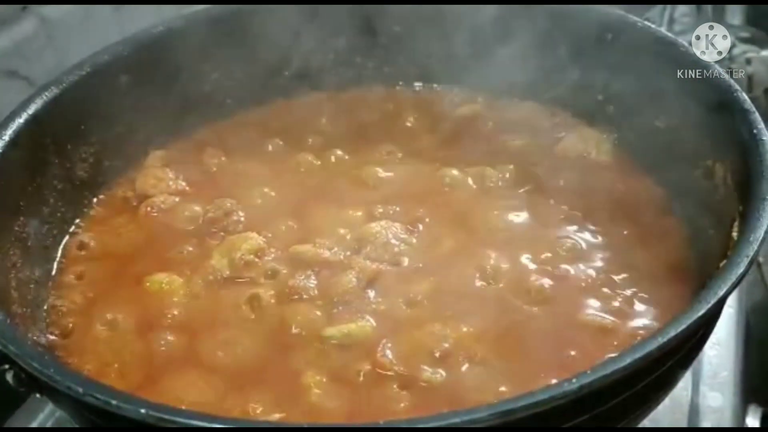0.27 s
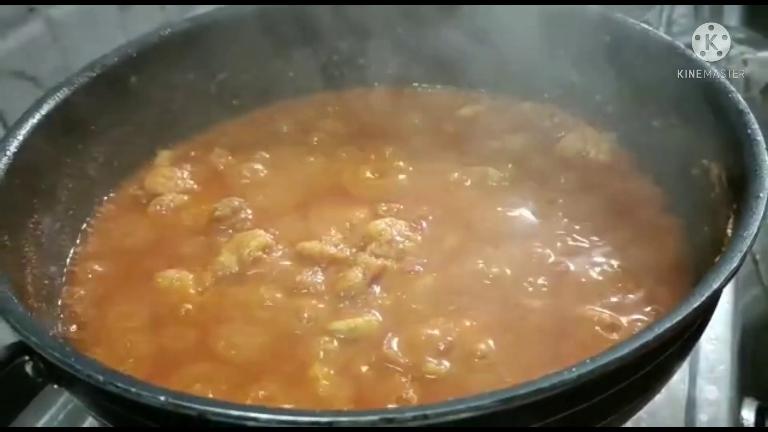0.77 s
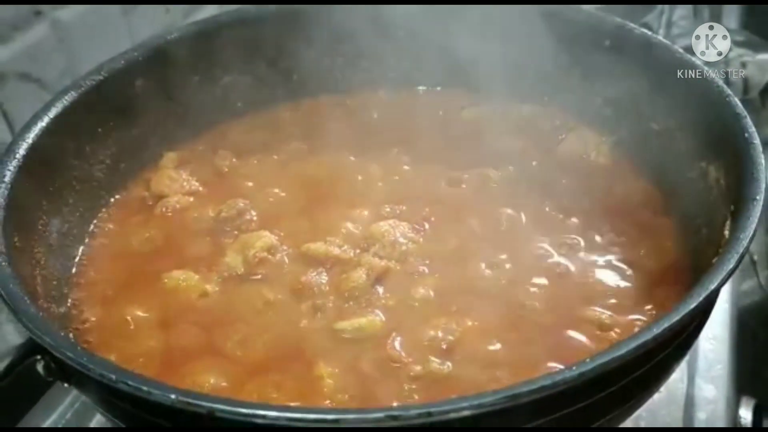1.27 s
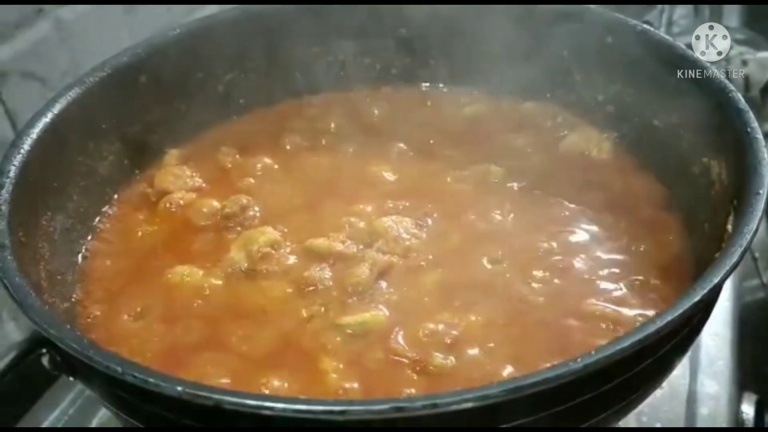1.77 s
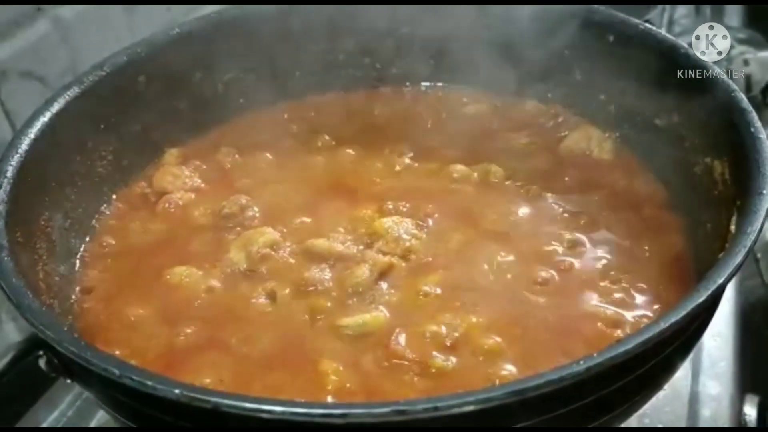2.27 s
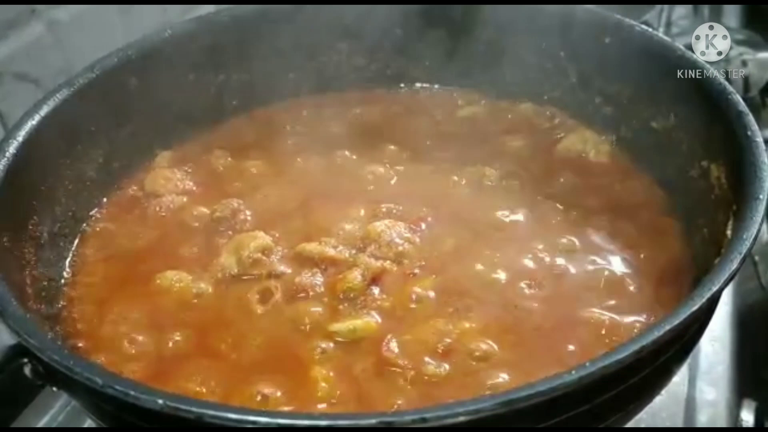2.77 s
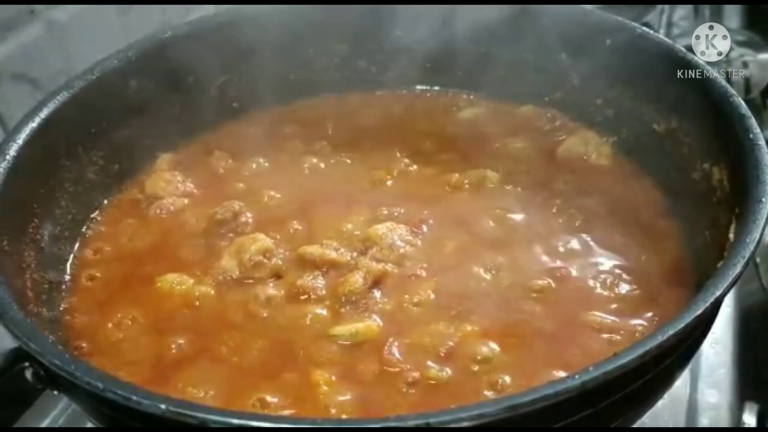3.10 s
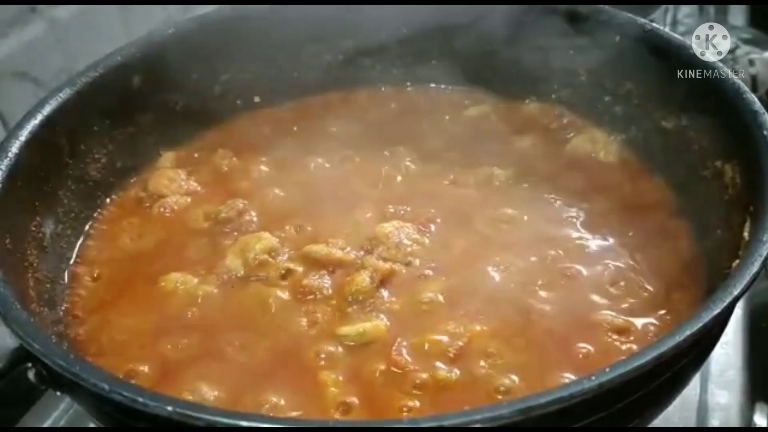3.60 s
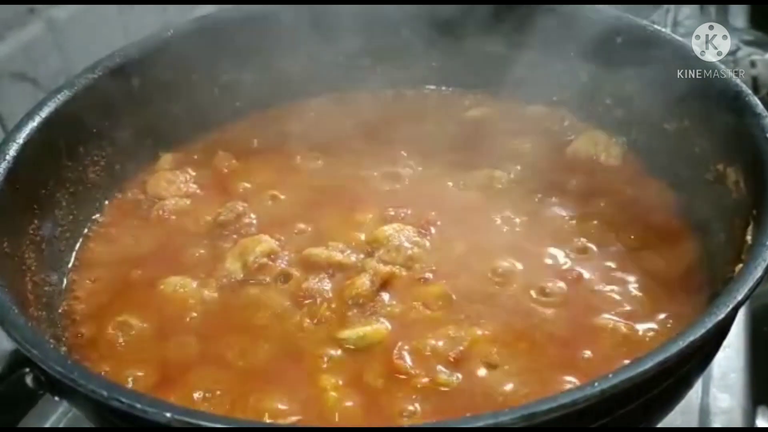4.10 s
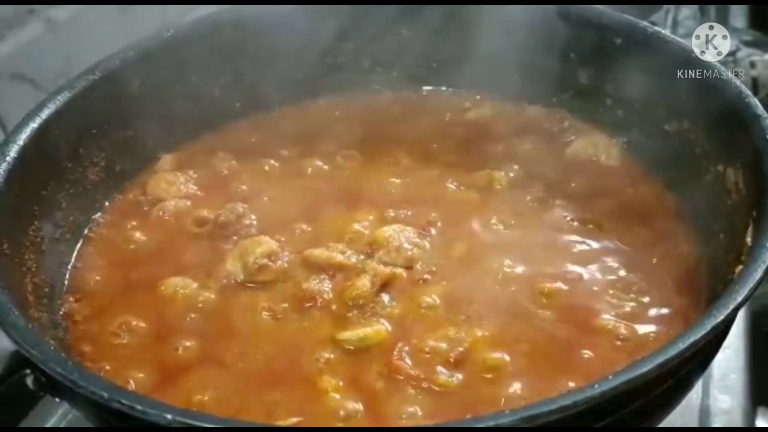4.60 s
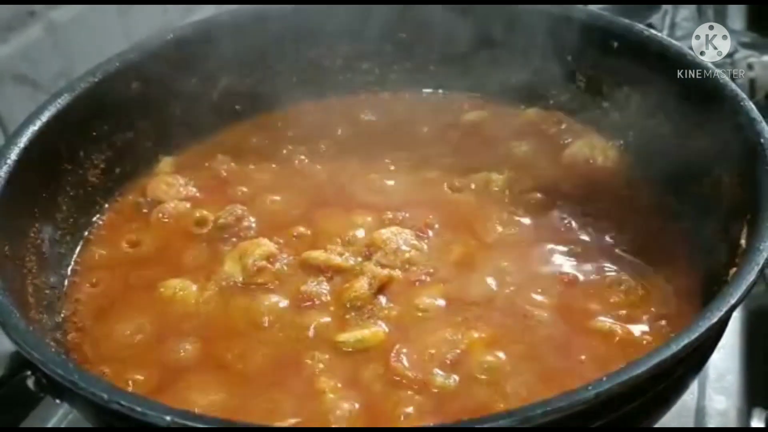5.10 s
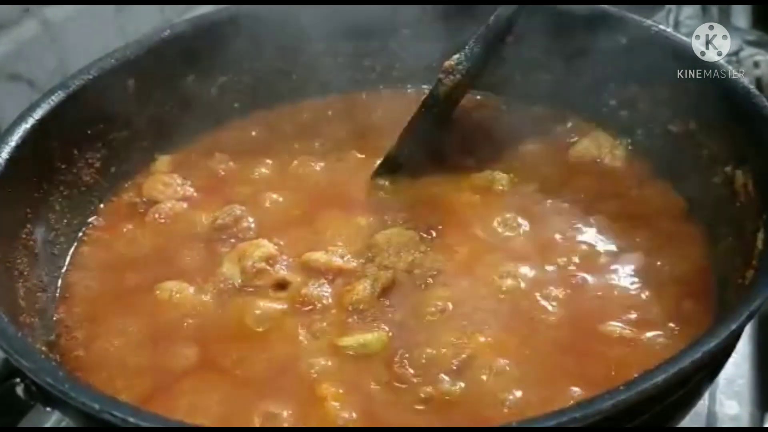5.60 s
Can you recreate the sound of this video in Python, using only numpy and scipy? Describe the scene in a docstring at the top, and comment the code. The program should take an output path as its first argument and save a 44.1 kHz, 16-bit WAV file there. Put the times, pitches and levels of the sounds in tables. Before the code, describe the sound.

A pan of thick sauce bubbles over a humming gas ring throughout. Bright metal scraping bursts in during the first two seconds, ending in a brief lower rim drag. After a very faint reedy note, a pot clatters onto the counter and chatters still. The simmer returns to the front, with thin wavering squeaks, spitting droplets, splashes and tiny clinks, heard close with short indoor echo.

```python
"""Thick curry simmers over a humming gas ring throughout: resonating bubbles over noise-like sizzle and flame.
From 0.6 s a steel utensil knocks and scrapes on a dish to the right, stick-slip jerks driving its modes;
then the dish drags briefly on its rim. A faint reedy tone of sine partials precedes a pot that lands at 2.1 s,
slides and rocks to rest. Thin wavering squeaks follow, then wet splashes, a rising gurgle and small clinks."""
import sys
import numpy as np
from scipy import signal
from scipy.fft import rfft, irfft
from scipy.io import wavfile
from scipy.ndimage import uniform_filter1d

SR = 44100
rng = np.random.default_rng(int(sys.argv[2]) if len(sys.argv) > 2 else 0)


def transcribe(u):
    """Save the signal u as a 16-bit wav file named by the first command-line argument.

    u: samples, shape (n,) or (channels, n), limited to [-1, 1]; the rate is SR.
    q: integer samples, one column per channel.
    """
    v = np.clip(np.atleast_2d(u).T, -1, 1)
    q = np.round(v * 32767).astype(np.int16)
    wavfile.write(sys.argv[1], SR, q)


N = 259308
T = np.arange(N) / SR   # time in seconds

# The utensil knocks on the dish and skids on. Each row: start in seconds, relative knock level in dB,
# skid length in seconds, relative skid pressure in dB.
STROKES = [(0.5543, -19, 0.033, -32), (0.6333, -19, 0.014, -29.5), (0.694, -24, 0.067, -27),
           (0.8673, -12, 0.05, -25.5), (0.935, -10.5, 0.035, -22), (1.0782, -10, 0.044, -23),
           (1.1368, -9, 0.055, -18), (1.185, -9.5, 0.053, -19), (1.25, -21, 0.086, -19),
           (1.3324, -9, 0.059, -16), (1.4078, -7.5, .11, -17.5), (1.6284, -16.5, 0.028, -35.5),
           (1.7215, -31.5, .02, -49)]
# Colour of spitting droplets. Each row: frequency in Hz, relative level in dB.
SPIT_COLOUR = [(1500, -25), (5000, -8), (8000, 4), (11000, 7), (15000, -24)]


def from_db(db):
    """Gain is the antilogarithm of a level: 20 dB is a factor of ten in amplitude."""
    return 10 ** (np.asarray(db) / 20)


def rms_one(x):
    """Normalise to unit root-mean-square amplitude."""
    return x / np.sqrt(np.mean(x ** 2) + 1e-20)


def energy_one(response):
    """An impulse response of unit mean energy keeps the power of white noise."""
    return rms_one(response) / np.sqrt(response.shape[-1])


def at_hz(points, hz):
    """Interpolate (Hz, value) points on a logarithmic frequency axis."""
    f, value = np.transpose(points)
    return np.interp(np.log(np.maximum(hz, 1)), np.log(f), value)


def bins(size):
    """Discrete spectra sample frequency evenly: the bin frequencies in Hz for size samples."""
    return np.arange(size // 2 + 1) * SR / size


def waver(span):
    """Low-pass noise: white noise averaged twice over span seconds, with unit rms."""
    size = max(int(span * SR), 2)
    once = uniform_filter1d(rng.standard_normal(N), size)
    return rms_one(uniform_filter1d(once, size))


def tone(hz, wobble):
    """Frequency modulation: a sine whose phase accumulates an unsteady frequency."""
    unsteady_hz = hz * (1 + wobble * waver(span=0.0082))
    return np.sin(2 * np.pi * np.cumsum(unsteady_hz) / SR)


def swell(start, length, db, attack_s, release_db_per_s, sag_db_per_s=0):
    """Envelope of one gesture: a linear rise, a hold or sag for its length, then exponential decay."""
    age = np.maximum(T - start, 0)
    loss_db = sag_db_per_s * age + release_db_per_s * np.maximum(age - length, 0)
    return np.minimum(age / attack_s, 1) * from_db(db - np.clip(loss_db, 0, 200))


def diffuse(spectrum, size):
    """Diffuse-field coherence: coloured stereo noise, most alike at both ports in the bass."""
    # Likeness of the two ports. Each row: frequency in Hz, correlation.
    likeness = [(100, 1), (300, 0.95), (600, 0.81), (1000, 0.27), (1500, -0.31), (2500, 0.22),
                (4000, -0.051)]
    hz = bins(size)
    alike = np.clip(at_hz(likeness, hz), -1, 1)
    mid, side = rfft(rng.standard_normal((2, size)))
    pair = np.sqrt(1 + alike) * mid + np.sqrt(1 - alike) * side * [[1], [-1]]
    return rms_one(irfft(pair * from_db(at_hz(spectrum, hz)), size))


def dying(spectrum, t60, size=32768):
    """High modal density: countless overlapping modes ring as decaying noise; the treble dies sooner."""
    noise, t = diffuse(spectrum, size=size), T[:size]
    low = signal.sosfilt(signal.butter(1, 5000, fs=SR, output="sos"), noise)
    treble = noise - low
    return energy_one(low * from_db(-60 * t / t60) + treble * from_db(-60 * t / (0.32 * t60)))


def modal(modes, spread_db=0, size=32768):
    """Modal superposition: decaying sines, later at the left port; their shares vary by chance with spread_db."""
    lag_s = -0.0003   # how much sooner the left port hears the metal
    t, out = T[:size], 0
    for hz, db, t60 in modes:
        delay_phase = np.pi * hz * lag_s * np.array([[1], [-1]])
        phase = rng.uniform(0, 2 * np.pi) + delay_phase + rng.normal(0, 1.0, (2, 1))
        decay = from_db(db + spread_db * rng.normal() - 60 * t / t60) / np.sqrt(t60)
        out = out + decay * np.sin(2 * np.pi * hz * t + phase)
    return energy_one(out)


def crowd(modes, spectrum, t60, width_hz, valley_db, count=55):
    """Modal clustering: weaker modes gather round the strong ones and scatter through the treble."""
    ring = dying(spectrum, t60)
    hz = bins(ring.shape[-1])
    treble = np.linspace(6400, 16000, count) + rng.normal(0, 60, count)
    centres = np.r_[np.array(modes)[:, 0], treble]
    clusters = np.exp(-((hz - centres[:, None]) / width_hz) ** 2).max(axis=0)
    shaped = irfft(rfft(ring) * (from_db(valley_db) + clusters))
    return energy_one(shaped * (T[:shaped.shape[-1]] < .5))   # no ring after 0.5 s


def building(response, rise_s):
    """Finite spreading time: a response builds up exponentially with time constant rise_s."""
    return response * (1 - np.exp(-T[:response.shape[-1]] / rise_s))


def sound(force, response):
    """Linear response: convolve a force with a body's impulse response."""
    return signal.fftconvolve(np.atleast_2d(force), response, axes=-1)[:, :N]


def blows(rows):
    """An ideal impact is an impulse: one click for each row of (s, dB)."""
    out = np.zeros(N)
    for s, db in rows:
        out[int(s * SR)] += from_db(db)
    return out


def grains(per_s, spread_db):
    """Random point process: clicks of either sign and uneven size at random moments, with unit rms."""
    sizes = from_db(spread_db * np.minimum(rng.exponential(1, N), 3.5)) * rng.choice([-1, 1], N)
    return rms_one(sizes * (rng.random(N) < per_s / SR))


def softened(force, corner_hz):
    """Contact compliance: a sliding contact is softer than a knock and has less treble."""
    return signal.sosfilt(signal.butter(1, min(corner_hz, .45 * SR), fs=SR, output="sos"), force)


def bubble(hz, t60, rise, size=4096):
    """Cavity resonance: an opening bubble rings, rising in pitch as its mouth widens."""
    t = T[:size]
    glide = 1 + rise * np.minimum(t / t60, 1)
    ring = np.sin(2 * np.pi * hz * np.cumsum(glide) / SR)
    return ring * from_db(-60 * t / t60) * (1 - np.exp(-t * hz))


def from_pan(x):
    """Interaural-style delay: sound from the pan reaches the left port first."""
    lag_s = 0.00021
    return np.array([x, np.interp(T - lag_s, T, x)])


def add(out, s, x):
    """Superposition: mix x into out from time s."""
    at = int(s * SR)
    out[at:at + len(x)] += x[:N - at]


def skid_pressure(strokes):
    """Contact force of sliding: every skid bites, eases and lifts off."""
    return sum(swell(s, length, db, attack_s=0.0035, release_db_per_s=431, sag_db_per_s=41)
               for s, _, length, db in strokes)


def scraping(strokes):
    """Stick-slip friction: a knock for each stroke, then tiny jerks under the skid pressure."""
    grip = from_db(2.95 * waver(span=0.005))   # the edge catches and lets go
    rough_force = skid_pressure(strokes) * grip * grains(per_s=800, spread_db=0)
    jerks = softened(rough_force, corner_hz=10000)
    knocks = blows([row[:2] for row in strokes])
    return from_db(23.5) * knocks + from_db(1.5) * jerks


def dish(count=3):
    """Modal excitation by place: strokes on a few spots in turn differ in colour; the dragged rim rings lower."""
    # Ringing modes of dish and rim. Each row: frequency in Hz, relative level in dB, t60 in seconds.
    dish_modes, rim_modes = [(678, -10, .25), (763, -19, .4), (1027, -11, .5), (1561, -15, .6),
                             (1849, -4, .4), (1999, -5, .4), (2080, -7, .6), (2219, -9, .4),
                             (2670, -11, .4), (2834, -9, .5), (2902, -4, .7), (3046, -8, .6),
                             (3091, -5.5, .9), (3251, -10, .4), (3397, -4, .4), (3461, -.5, .5),
                             (3836, -7, .35), (4039, 2, .45), (4230, -8, .4), (4583, -9, .35),
                             (4670, -9, .35), (4930, -7, .3), (5255, -2, .4), (5731, -11, .3),
                             (6141, -2, .4), (6700, -17, .3), (7674, -12, .25), (8200, -13, .2),
                             (8420, -12, .2), (8880, -15, .2)], [(675, -12, .2), (765, -8, .4), (850, -8, .35),
                                                 (977, -10, .4), (1047, -3, .55), (1120, -4, .4),
                                                 (1165, 0, .3), (1203, 2.5, .9), (1269, 3, .45),
                                                 (1573, -7, .45), (1740, -11, .5), (2217, -6, .3),
                                                 (2271, -3, .35), (2376, -12, .4)]
    # Weaker modes of dish and rim. Each row: frequency in Hz, relative level in dB.
    dish_body, rim_body = [(50, -50), (100, -7), (420, -10), (560, -3.5), (680, -4.5), (800, -12.5),
                           (1400, -11), (2000, -3.5), (3300, -1.5), (6000, 0), (7200, -15.5), (8300, -6),
                           (11000, -11), (15000, -11.5)], [(80, -61), (130, -24), (450, -24), (700, -10), (900, -9),
                                              (1150, -4.5), (1450, -12.5), (2250, -4.5), (2800, -20),
                                              (8000, -57)]
    weak = from_db(-.5) * crowd(dish_modes, dish_body, t60=0.18, width_hz=70, valley_db=-13)
    # the counter beneath the dish
    thud = from_db(-28) * dying([(60, -17), (100, -8), (150, -16), (300, -33), (600, -35)], t60=0.15)
    out = 0
    for spot in range(count):
        body = from_db(-4.0) * modal(dish_modes, spread_db=2.5) + weak + thud
        out = out + sound(scraping(STROKES[spot::count]), building(body, rise_s=0.0016))
    # the last strong stroke drags the dish along on its rim
    drag = swell(1.415, 0.081, -15, attack_s=0.017, release_db_per_s=298)
    rim = from_db(-1.5) * modal(rim_modes) + from_db(-1) * dying(rim_body, t60=0.11)
    return out + sound(drag * grains(per_s=900, spread_db=-1.5), building(rim, rise_s=0.00085))


def groan():
    """Friction-driven vibration: the skidding edge shudders on a low, rough, wandering note."""
    # -11 dB relative to the skid pressure
    loudness = skid_pressure(STROKES) * from_db(-11 + 4.1 * waver(span=0.0044))
    return loudness * tone(685, wobble=0.03995)


def pot():
    """Impact and friction excite coupled bodies: the pot clatters, the counter booms and the wall hums on."""
    # The base hits the counter. Each row: time in seconds, relative level in dB.
    pot_hits = [(2.1091, -2), (2.1405, -2.5), (2.1594, -5.5), (2.1979, -3.5), (2.2548, -28),
                (2.2674, -10.5), (2.329, -18)]
    # The pot tips on to its base and chatters. Each row: start in seconds, length in seconds.
    rocks = [(2.238, 0.026), (2.323, 0.0091), (2.454, 0.059), (2.601, 0.073), (2.691, 0.031), (2.81, 0.012)]
    # Ringing modes of the pot. Each row: frequency in Hz, relative level in dB, t60 in seconds.
    pot_modes = [(303, -16, .2), (386, -22, .2), (1014, -12, .35), (1144, -4, .35), (1242, -5, .3),
                 (1633, -12, .2), (1758, -11, .2), (1843, -7, .25), (1939, -9, .2), (2069, -8, .2),
                 (2191, -4, .2), (2246, 1, .25), (2377, -9, .2), (3363, -15, .25), (3846, -20, .2),
                 (4035, -16, .2), (4423, -13, .2), (6189, -20, .2)]
    # Weaker modes of the pot, the rocking pot and the counter. Each row: frequency in Hz, relative level in dB.
    pot_body, rock_body, counter_body = [(60, -59), (260, -12), (550, -18), (870, -16), (1200, -2),
                                         (1450, -9.5), (1800, -5.5), (2300, 1.5), (3000, -20), (4400, -9.5),
                                         (5100, -32), (6200, -23), (8500, -22), (15000, -37.5)], [(900, -23), (1150, -2.5), (1500, -29),
                                                           (1840, -5.5), (1980, -14), (2130, -4),
                                                           (2250, 8.5), (2420, -6.5), (2750, -40),
                                                           (4400, -19.5), (6000, -52)], [(40, -38), (70, -22),
                                                                              (105, 2), (140, -3), (190, 3),
                                                                              (300, 0), (380, -4),
                                                                              (500, -16), (1000, -35)]
    # Partials of the wall. Each row: start in seconds, frequency in Hz, level in dB, fade in dB per second.
    wall_tones = [(2.15, 232, -37.5, 14), (2.142, 672, -26, 74), (2.17, 700, -30.5, 61),
                  (2.25, 765, -28.5, 40.5), (2.27, 641, -35.5, 35), (2.31, 953, -37.5, 68)]
    landing_s = 2.107
    hits, judder = blows(pot_hits), grains(per_s=700, spread_db=4.0)
    # forces: sliding to a stop, weight settling, base rumbling until at rest
    pressure = swell(landing_s, 0.16, -13, attack_s=0.024, release_db_per_s=230, sag_db_per_s=25.5)
    weight = swell(landing_s, 0, -23, attack_s=0.0017, release_db_per_s=142)
    rolling = swell(landing_s, 0.86, -45, attack_s=0.17, release_db_per_s=300, sag_db_per_s=12)
    rocking = 0
    for s, length in rocks:
        rock_db = -15 - 54.5 * (s - rocks[0][0])   # later rocks weaken steadily
        rocking = rocking + swell(s, length, rock_db, attack_s=0.0067, release_db_per_s=464)
    weak = crowd(pot_modes, pot_body, t60=0.11, width_hz=50, valley_db=-2.0)
    body = from_db(-2.5) * modal(pot_modes) + from_db(-2) * weak
    clatter = sound(from_db(17.0) * hits + pressure * judder, building(body, rise_s=0.00082))
    rock_ring = building(dying(rock_body, t60=0.049), rise_s=0.0016)
    flutter = sound(from_db(1.5) * rocking * judder, rock_ring)
    counter_ring = building(dying(counter_body, t60=0.095), rise_s=0.0033)
    counter = sound((weight + rolling) * judder + from_db(4.0) * hits, counter_ring)
    wall = sum(swell(s, 0, db, attack_s=0.044, release_db_per_s=fade) * tone(hz, wobble=0.00656)
               for s, hz, db, fade in wall_tones)
    return clatter + flutter + counter + wall


def small_metal():
    """Frictional self-oscillation squeaks on a wavering, slowly sinking note; light impacts clink."""
    # The squeak catches in short notes. Each row: start in seconds, length in seconds, level in dB.
    squeaks = [(2.972, 0.12, -45.5), (3.095, 0.085, -36), (3.216, .045, -39.5), (3.42, .12, -56),
               (3.562, .03, -46), (3.614, 0.028, -39.5), (3.812, 0.06, -46)]
    # Light touches of steel. Each row: time in seconds, relative level in dB.
    clinks = [(4.3404, -26), (5.3368, -45)]
    # Ringing modes of the touched steel. Each row: frequency in Hz, relative level in dB, t60 in seconds.
    clink_modes = [(3100, -21, 0.19), (3500, -26, 0.062), (3890, -2, 0.028), (4090, -8, 0.087),
                   (4660, 4, .08)]
    rubbing = sum(swell(*row, attack_s=0.021, release_db_per_s=650) for row in squeaks)
    sinking_hz = 3040 - 25 * (T - squeaks[0][0])
    squeak = rubbing * tone(sinking_hz, wobble=0.00345)
    weak = dying([(2300, -29), (3000, 2), (4700, -7), (5600, -30)], t60=0.086)
    clink = modal(clink_modes) + from_db(3.5) * weak
    return from_pan(squeak) + sound(from_db(16) * blows(clinks), building(clink, rise_s=0.00059))


def simmer(count=420):
    """Bubble resonance: big bubbles plop with a wet tick, small ones burst at random; droplets spit and splash."""
    # Big bubbles bursting. Each row: time in seconds, relative level in dB, starting pitch in Hz, t60 in seconds.
    plops = [(0.119, -38, 1670, 0.014), (0.274, -47.5, 1130, 0.022), (0.436, -50, 1010, 0.016),
             (2.772, -38, 2110, 0.0048), (3.206, -42.5, 1690, 0.015), (3.586, -43.5, 1293, 0.0084),
             (3.976, -44, 2430, 0.018), (4.389, -42.5, 870, 0.012), (4.515, -51, 1050, 0.015),
             (4.93, -49, 891, 0.015), (4.986, -47.5, 1120, 0.016), (5.166, -47, 1680, 0.028),
             (5.844, -47.5, 1650, 0.03)]
    # Small bubbles pinging. Each row: time in seconds, relative level in dB, starting pitch in Hz.
    pings = [(5.1447, -31, 5850), (5.2425, -36.5, 5700)]
    # Droplets spitting, and wet splashes. Each row: time in seconds, relative level in dB.
    spit_times, splash_times = [(3.522, -39), (3.7695, -33), (4.6279, -43), (4.7306, -41), (4.9318, -32),
                                (5.032, -43), (5.5159, -52), (5.5408, -35.5), (5.64, -41)], [(3.688, -37), (3.718, -36.5), (3.947, -37.5), (3.947, -29.5),
                                               (3.977, -35.5), (4.01, -37.5), (4.089, -30.5),
                                               (4.105, -30.5)]
    # Colour of the splashes. Each row: frequency in Hz, relative level in dB.
    splash_colour = [(150, -28), (400, 8.5), (800, -4.5), (1500, -6), (2500, -2.5), (3050, -2.5),
                     (3500, -17), (4200, -0.5), (5000, -11.5), (14000, -25)]
    out = np.zeros(N)
    for s, db, hz, t60 in plops:
        add(out, s, from_db(db + 16.5) * bubble(hz, t60, rise=0.032))
    for when, height, strength in rng.random((count, 3)):
        hz = 550 * 5 ** height
        level = from_db(-48 + 20 * strength ** 3 - 16 * height)   # higher bubbles are fainter
        add(out, when * T[-1], level * bubble(hz, 22 / hz, rise=0.049))
    for s, db, hz in pings:
        add(out, s, from_db(db + 3.0) * bubble(hz, 130 / hz, rise=0.067))
    wet = dying([(250, -13), (900, 7), (1800, 5), (4000, -55)], t60=0.08)
    ticks = sound(from_db(17.5) * blows([row[:2] for row in plops]), wet)
    spits = sound(from_db(13) * blows(spit_times), dying(SPIT_COLOUR, t60=0.025))
    splashes = sound(from_db(19.5) * blows(splash_times), dying(splash_colour, t60=0.15))
    return from_pan(out) + ticks + spits + splashes


def gurgle():
    """Channel resonance: a narrowing steam channel sings a rising note in a few quick gulps."""
    # Gulps of steam through one channel. Each row: start in seconds, length in seconds, level in dB.
    gulps = [(4.099, 0.0088, -34.5), (4.117, 0.011, -32.5), (4.139, 0.0091, -34), (4.167, 0.007, -29.5)]
    flow = sum(swell(*row, attack_s=0.0053, release_db_per_s=1100) for row in gulps)
    closing_s = .11   # the channel narrows ever faster from the first gulp until it closes
    age = np.clip(T - gulps[0][0], 0, closing_s)
    rising_hz = 1080 + 2800 * age ** 2 / closing_s
    return from_pan(flow * tone(rising_hz, wobble=0.0123))


def fizz(count=900):
    """Bubble resonance at small size: tiny bubbles in the oil ping, each at its own pitch; most are faint."""
    low_hz, high_hz = 3650, 8400
    out = np.zeros(N)
    for when, height, strength in rng.random((count, 3)):
        hz = low_hz * (high_hz / low_hz) ** height
        level = from_db(-56.5 + 19 * strength ** 4)
        add(out, when * T[-1], level * bubble(hz, 58 / hz, rise=.04, size=1024))   # t60 of 58 cycles
    return from_pan(out)


def reedy_tone():
    """Additive synthesis: a few sine partials swell into a faint reedy note and stop."""
    # Partials of the note. Each row: frequency in Hz, relative level in dB.
    partials = [(1473, -9), (1965, 1.5), (2455, -0.5), (2942, 3.5)]
    loudness = swell(1.885, .125, -49, attack_s=0.08, release_db_per_s=200)
    return loudness * sum(from_db(db) * tone(hz, wobble=0.0029) for hz, db in partials)


def sizzle():
    """Random impulses merge into noise: oil crackles at the pan's hot edge over a smooth hiss of steam."""
    # Colour of crackle and hiss. Each row: frequency in Hz, relative level in dB.
    colour = [(400, -26), (800, 6), (1300, 6), (2000, 2.5), (3000, -2), (3550, 0), (4500, -2), (5400, 2),
              (6050, 8), (6900, -8.5), (8000, -1.5), (9600, -16), (11000, -13.5), (14500, -56)]
    pops = rfft(grains(per_s=900, spread_db=12.5))
    crackle = rms_one(irfft(pops * from_db(at_hz(colour, bins(N))), N))
    mist = sound(grains(per_s=65, spread_db=6.5), dying(SPIT_COLOUR, t60=0.0043))   # the finest droplets
    hiss = diffuse(colour, size=N)
    return from_db(-55) * from_pan(crackle) + from_db(-65.5) * mist + from_db(-51) * hiss


def flame():
    """Broadband flow noise: the gas flame is a steady low rumble of coloured noise."""
    # Colour of the flame. Each row: frequency in Hz, relative level in dB.
    colour = [(25, -25), (45, -34), (70, -7), (110, -3.5), (160, -1), (220, -4), (280, -13.5), (340, -12.5),
              (450, -21), (600, -14.5), (1000, -22.5), (2000, -40)]
    return from_db(-46.5) * diffuse(colour, size=N)


def hum():
    """Narrow-band noise sounds like an unsteady tone: a low hum near 155 Hz."""
    return from_db(-51.5) * diffuse([(135, -68), (154, 9.5), (160, -4.0), (180, -42.0)], size=N)


def scene():
    """Superposition and reverberation: metal and simmer share the kitchen's echo above flame and hum."""
    deep_cut = signal.butter(4, 75, "high", fs=SR, output="sos")   # the metal sounds carry no deep bass
    metal = signal.sosfilt(deep_cut, dish() + groan() + pot() + small_metal())
    curry = simmer() + gurgle() + fizz()
    kitchen = building(dying([(100, 27.5), (3000, 19), (12000, 1)], t60=0.65), rise_s=0.0025)
    echo = sound(from_db(-10.0) * metal + from_db(-16.0) * curry, kitchen)
    return metal + curry + echo + reedy_tone() + sizzle() + flame() + hum()


def gain_control(x, threshold_db, release_db_per_s, share):
    """Dynamic compression: turn loud passages down quickly and let the gain come back slowly."""
    power = uniform_filter1d(np.mean(x ** 2, axis=0), size=260)
    over = np.maximum(10 * np.log10(np.maximum(power, 1e-12)) - threshold_db, 0)
    # the excess in dB, falling no faster than the release
    held = np.maximum.accumulate(over + release_db_per_s * T) - release_db_per_s * T
    return x * from_db(-np.clip(share, 0, 1) * uniform_filter1d(held, size=130))


def record(dry):
    """Port resonance colours each channel; gain control holds loud clatter, peaks round off, the top is cut."""
    # The two microphone ports resonate differently. Each row: frequency in Hz, left minus right in dB.
    ports = [(100, 1.2), (600, .5), (1300, -1), (2200, -4), (4200, -4), (5200, -9), (6100, -15), (7000, -1),
             (8200, 16), (11000, 12), (13500, 2), (15500, -2)]
    tilt = from_db(at_hz(ports, bins(N)) / 2 * np.array([[1], [-1]]))
    even_tilt = tilt / np.sqrt(np.mean(tilt ** 2, axis=0))   # keeps the mean power of the pair
    heard = irfft(rfft(dry) * even_tilt, N)
    held = gain_control(heard, threshold_db=-8.0, release_db_per_s=67, share=0.39)
    rounded = held / (1 + (held / .9) ** 8) ** (1 / 8)   # peaks stay within 0.9
    top_cut = signal.ellip(10, .2, 90, 15900, fs=SR, output="sos")
    return signal.sosfilt(top_cut, rounded)


dry = scene()
out = record(dry)
transcribe(out)
```